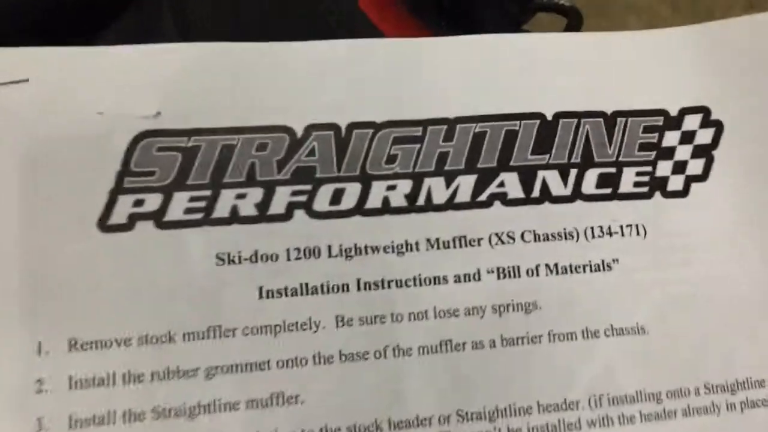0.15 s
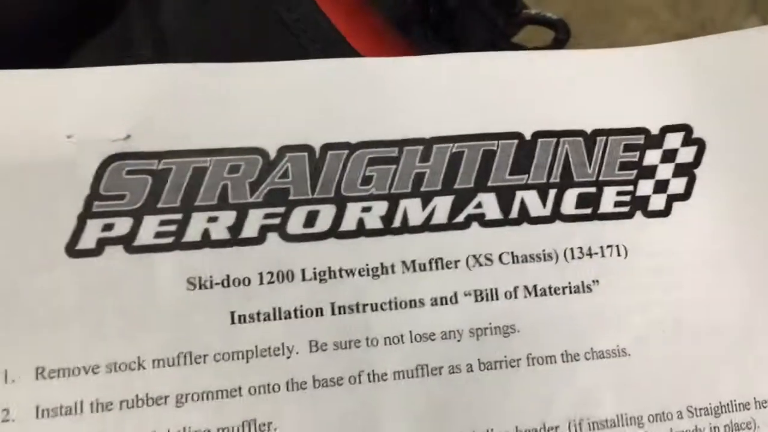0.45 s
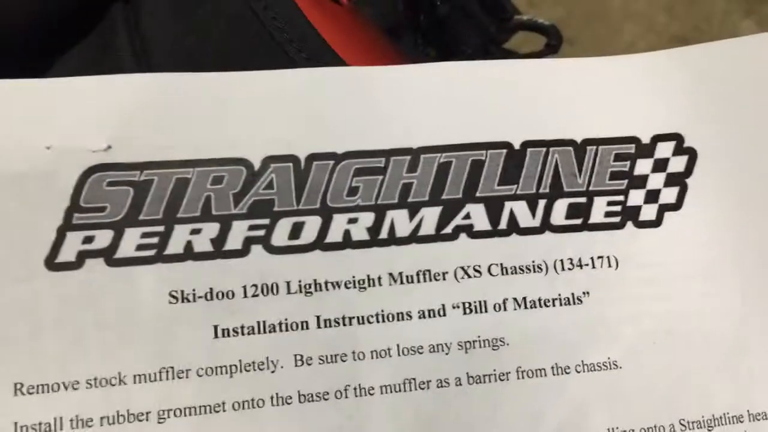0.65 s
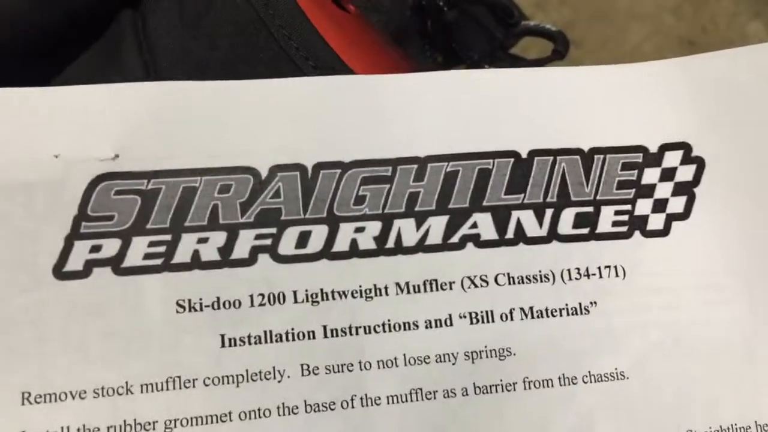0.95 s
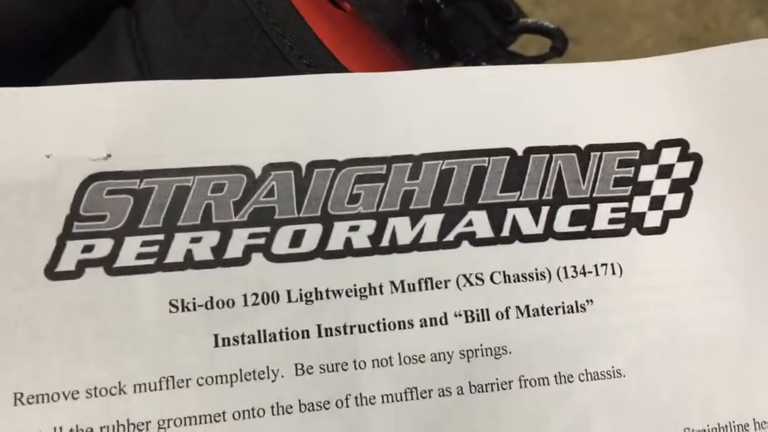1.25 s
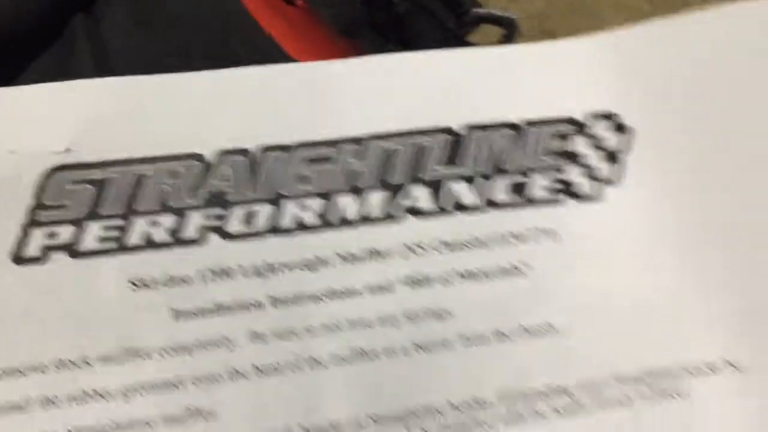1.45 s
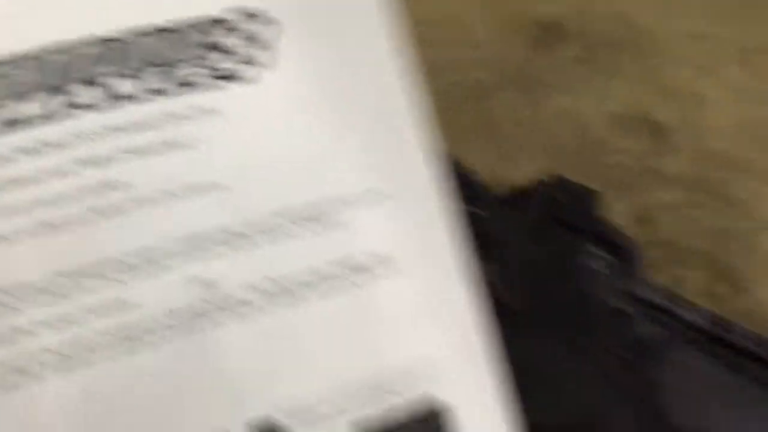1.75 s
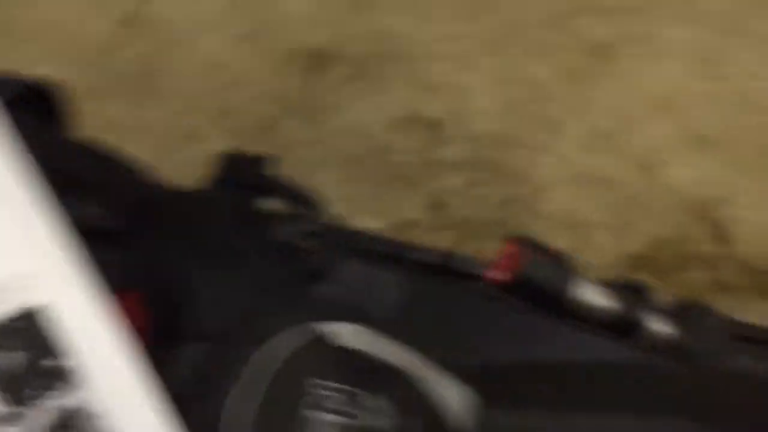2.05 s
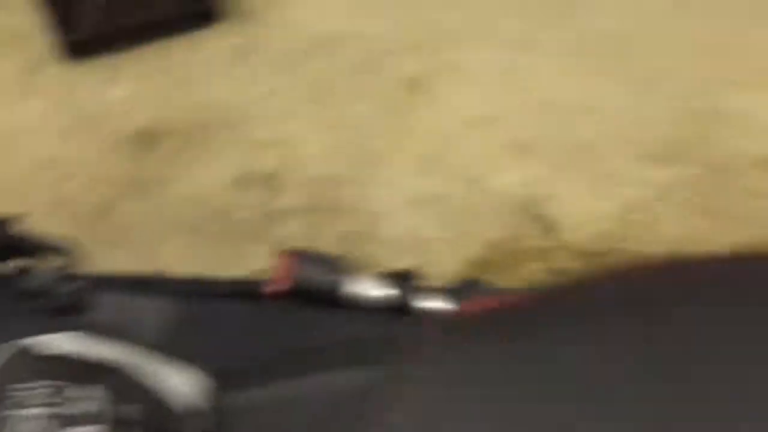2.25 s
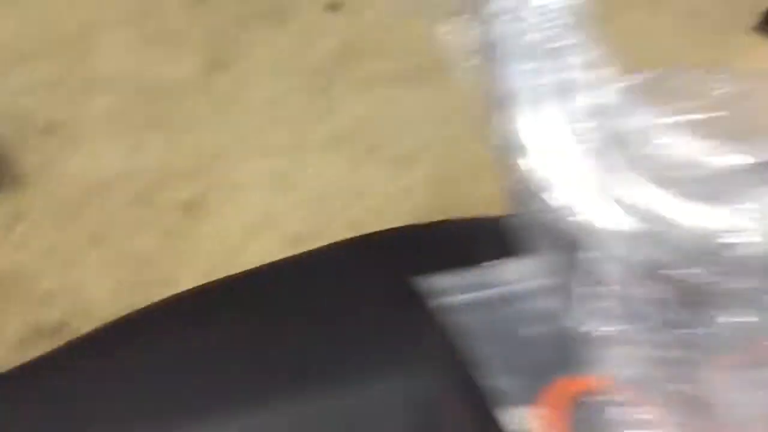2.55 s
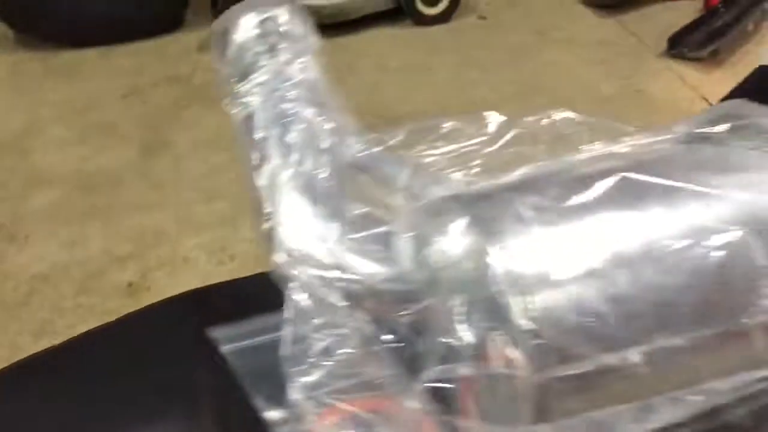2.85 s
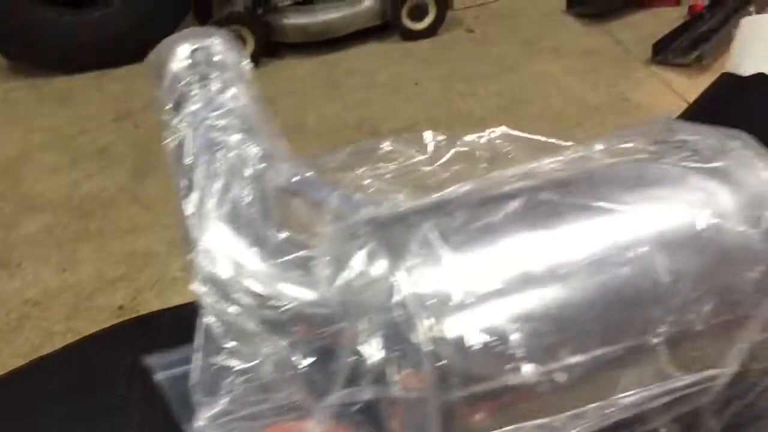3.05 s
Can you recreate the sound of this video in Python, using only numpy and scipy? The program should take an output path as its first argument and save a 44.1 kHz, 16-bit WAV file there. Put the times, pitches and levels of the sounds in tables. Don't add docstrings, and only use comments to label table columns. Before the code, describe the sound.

An engine idles with a deep, fast, slightly uneven muffled throb in a garage, hissing and ticking.

```python
import sys
import numpy as np
from scipy import signal
from scipy.fft import rfft, irfft
from scipy.io import wavfile
from scipy.ndimage import uniform_filter1d

SR = 44100
rng = np.random.default_rng(int(sys.argv[2]) if len(sys.argv) > 2 else 0)


def dump_mix(stems):
    frames = np.atleast_2d(stems).T
    limited = np.clip(frames, -1, 1)
    pcm = np.round(limited * 32767).astype(np.int16)
    wavfile.write(sys.argv[1], SR, pcm)


def nominal_scale(level):
    x = np.asarray(level, float) / 20
    return 10 ** x


N = 141120
LEAD = SR // 4
RING_LAG_S = .045


def column(table, col, ahead_s=0.):
    table = np.array(table, float)
    return np.interp(np.arange(N) / SR + ahead_s, table[:, 0], table[:, col])


def level(x, db):
    return x * nominal_scale(db) / np.sqrt(np.mean(x ** 2))


def ring(x, hz, width_hz):
    return signal.lfilter(*signal.iirpeak(hz, hz / width_hz, fs=SR), x)


def ring_twice(x, hz, width_hz):
    return ring(ring(x, hz, width_hz), hz, width_hz)


def walk(rate_hz):
    k = int(SR / rate_hz)
    steps = np.repeat(rng.standard_normal(N // k + 1), k)
    w = uniform_filter1d(uniform_filter1d(steps, k), k)[:N]
    return w / w.std()


def clicks(places, sizes):
    out = np.zeros(N + LEAD)
    np.add.at(out, np.clip(places.astype(int) + LEAD, 0, N + LEAD - 1), sizes)
    return out


# start in seconds, firing rate in Hz, load in dB.
IDLE = [(0.0, 39.9, -5), (0.17, 39.33, -4.5), (0.29, 40.91, -2.5), (0.77, 40.62, -3.5), (1.09, 39.82, -4.5),
        (1.16, 40.5, -4.5), (1.3, 40.89, -2.5), (1.54, 40.0, -3), (1.6, 39.38, -4), (1.91, 40.25, -3.5),
        (1.97, 40.28, -3.5), (2.04, 39.86, -3), (2.27, 40.06, -4), (2.41, 40.63, -2), (2.75, 40.0, -0.5),
        (3.01, 40.71, -1.5), (3.14, 40.88, -3.5), (3.2, 40.4, -1.5)]


def firing_phase():
    return np.cumsum(column(IDLE, col=1, ahead_s=RING_LAG_S)) / SR + .6


# time in seconds, firing level change in dB, thump in dB, firing delay in ms.
STUMBLES = [(0.321, -6, -37.5, 2.26), (0.371, -2, -27.5, 0.25), (0.478, -4.5, -37, 0.99),
            (0.542, 0.5, -32, 1), (0.621, 0, -35, 1.2), (0.782, -6.5, -28.5, 0.36), (.84, 2, -33, .2),
            (1.178, -5.5, -31.5, 0.82), (1.35, -5.5, -38.5, 1.1), (1.592, -10, -34.5, .2),
            (1.918, -7, -27, 2.8), (1.972, -5, -26.5, 0.93), (2.209, 0.5, -32, 0.17),
            (2.349, -1, -43, 0.51), (2.498, -3, -36, .1), (2.628, 0.5, -33, 0.15), (2.779, -3.5, -21.5, .2),
            (2.832, -4.5, -23, 1.22), (2.896, -2.5, -20.5, 0.48), (2.948, -4, -34, 0.93),
            (3.081, 1.5, -42, 1.52)]


def firings(phase):
    cylinders_db, scatter_db, jitter_periods, stumble_s = (.5, -.7, .2), .9, .006, .021
    at = np.flatnonzero(np.diff(np.floor(phase)))
    earlier = at[0] - (at[1] - at[0]) * np.arange(9, 0, -1)
    at = np.concatenate([earlier, at])
    chance = rng.standard_normal((len(at), 2))
    db = np.array(cylinders_db)[np.arange(len(at)) % 3] + scatter_db * chance[:, 0]
    db = db + column(IDLE, col=2, ahead_s=RING_LAG_S)[at.clip(0)]
    late_s = jitter_periods * chance[:, 1] / 40
    for s, change_db, _, late_ms in STUMBLES:
        near = np.exp(-((at / SR + RING_LAG_S - s) / stumble_s) ** 2)
        db = db + change_db * near
        late_s = late_s + late_ms * near / 1000
    return clicks(at + late_s * SR, nominal_scale(db) * SR / 40 / np.sqrt(2))


# centre in Hz, width in Hz, level turned away in dB, level facing in dB.
PIPE = [(40, 10, -26.5, -24.5), (83.3, 36, -16.5, -15.5), (124.1, 20, -20.5, -20),
        (168.44, 9.44, -14.5, -17.5), (196.9, 11.7, -11.5, -23.5), (256.5, 15, -56, -21.5),
        (269, 18.2, -33.5, -31), (321.3, 9.2, -41, -43), (350.8, 5.3, -38.5, -26), (476.4, 25.8, -42, -40),
        (553, 60, -49, -47), (684, 26, -48.5, -45)]


def exhaust(pulses, turn):
    node_hz, wander_db, wander_hz = 140, .8, 12
    out = 0
    for hz, width_hz, away_db, facing_db in PIPE:
        db = away_db + (facing_db - away_db) * turn + wander_db * walk(wander_hz)
        out = out + np.sign(node_hz - hz) * nominal_scale(db) * ring_twice(pulses, hz, width_hz)[LEAD:]
    return out


def room_boom(x):
    hz, width_hz, rise_s = 65.57, 5, .034
    return ring(ring(x, hz, width_hz), hz, 1 / rise_s / 2)[LEAD:]


def thumps():
    rise_s, width_hz, murmur_db = .034, 5, -33
    rows = np.array(STUMBLES)
    push = clicks((rows[:, 0] - rise_s) * SR, nominal_scale(rows[:, 2]) * SR / width_hz)
    return room_boom(push) + level(room_boom(rng.standard_normal(N + LEAD)), murmur_db)


# centre in Hz, width in Hz, lift turned away in dB, lift facing in dB.
CASING = [(950, 82, 8, 7), (1410, 300, 2.5, 5.5), (2417, 50, 4, 3.5), (3810, 90, 1, 9.5),
          (3850, 190, 7.5, -5.5), (5585, 970, 11, 8), (6960, 2700, 7, 6.5)]


def gas(points, lift_col, flicker_db, db):
    f = np.fft.rfftfreq(N, 1 / SR) + 1
    points = np.array(points)
    shape_db = np.interp(np.log(f), np.log(points[:, 0]), points[:, 1])
    shape_db = shape_db - 30 * np.clip(np.log2(250 / f), 0, 9)
    shape_db = shape_db - 3.5 * np.clip(np.log2(f / points[-1, 0]), 0, 9)
    for row in CASING:
        shape_db = shape_db + row[lift_col] / (1 + (2 * (f - row[0]) / row[1]) ** 2)
    noise = rfft(rng.standard_normal(N)) * nominal_scale(shape_db)
    place = 2 * np.log2(f / 100)
    out = 0
    for k in range(16):
        band = irfft(noise * np.clip(1 - abs(place - k), 0, 1), N)
        out = out + nominal_scale(flicker_db * walk(14)) * band
    return level(out, db)


# frequency in Hz, level in dB.
AWAY = [(250, -1.5), (400, -9), (1070, -14), (2200, -16.5), (4200, -22), (4900, -36), (9500, -39),
        (10500, -45.5)]
# frequency in Hz, level in dB.
FACING = [(250, -12.5), (380, -7.5), (700, -11.5), (2200, -15.5), (4200, -18.5), (4900, -33), (9500, -36),
          (10500, -40)]


def hiss(phase, turn):
    depth, decay_periods = .092, .29
    puff = 1 - depth + depth * np.exp(-(phase % 1) / decay_periods) / decay_periods
    puff = puff * nominal_scale(.54 * np.cos(2 * np.pi * phase / 3))
    away = gas(AWAY, lift_col=2, flicker_db=1.1, db=-36.5)
    facing = gas(FACING, lift_col=3, flicker_db=1.2, db=-32)
    return nominal_scale(-.14) * puff * (np.sqrt(1 - turn) * away + np.sqrt(turn) * facing)


def valves(phase):
    tick_hz, width_hz, decay_s, scatter_db = 3900, 2500, .006, 2.9
    hits = 0
    for place in (.08, .3, .41, .62, .75, .95):
        at = np.flatnonzero(np.diff(np.floor(phase / 3 - place)))
        hits = hits + clicks(at, nominal_scale(scatter_db * rng.standard_normal(len(at))))
    envelope = signal.lfilter([1], [1, -np.exp(-1 / (decay_s * SR))], hits)[LEAD:]
    out = envelope * rng.standard_normal(N)
    for _ in range(3):
        out = ring(out, tick_hz, width_hz)
    return level(out, -51)


def knock(phase):
    panel_hz, width_hz, decay_periods = 952, 1.1 * 75, .25
    rattle = np.exp(-(phase % 1) / decay_periods) * rng.standard_normal(N) * nominal_scale(1.1 * walk(12))
    return level(ring_twice(rattle, panel_hz, width_hz), -47)


def squeak():
    at_s, hz, length_s, db = 2.235, 3975, .05, -46
    tone = np.sin(2 * np.pi * np.cumsum(hz * (1 + .002966 * walk(40))) / SR)
    return level(tone, db) * np.exp(-((np.arange(N) / SR - at_s) / length_s) ** 2)


def rumble():
    return level(ring_twice(rng.standard_normal(N), hz=120, width_hz=160), -35)


def garage(x):
    t60_s, tail_db, gap_s = .3, -10, .006
    t = np.arange(SR // 2) / SR
    tail = rng.standard_normal(len(t)) * nominal_scale(-60 * t / t60_s) * (t > gap_s)
    return x + nominal_scale(tail_db) * signal.fftconvolve(x, tail / np.sqrt(np.sum(tail ** 2)))[:N]


# time in seconds, share facing the engine 0-1.
TURN = [
    (0, 0.06),
    (1.9, 0.01),
    (2.2, 0.19),
    (2.42, 0.4),
    (2.55, 0.72),
    (2.68, .9),
    (2.78, .8),
    (2.95, .99),
    (3.2, 0.65),
]


def phone_turn():
    return np.clip(column(TURN, col=1), 0, 1)


def scene():
    phase, turn = firing_phase(), phone_turn()
    engine = exhaust(firings(phase), turn) + thumps()
    treble = garage(hiss(phase, turn) + valves(phase) * nominal_scale(3 * turn))
    return (engine + treble + knock(phase) + squeak() + rumble())[None]


def top_cut(x):
    return signal.sosfilt(signal.butter(12, 16260, fs=SR, output="sos"), x)


def record(dry):
    low_cut_hz, top_hz, fade_in_s = 37, 15630, .004
    x = signal.sosfilt(signal.butter(4, low_cut_hz, "high", fs=SR, output="sos"), dry)
    x = x * np.clip(np.arange(N) / SR / fade_in_s, 0, 1)
    x = signal.sosfilt(signal.ellip(12, .2, 80, top_hz, fs=SR, output="sos"), x)
    return top_cut(x)


dry = scene()
out = record(dry)
dump_mix(out)
```